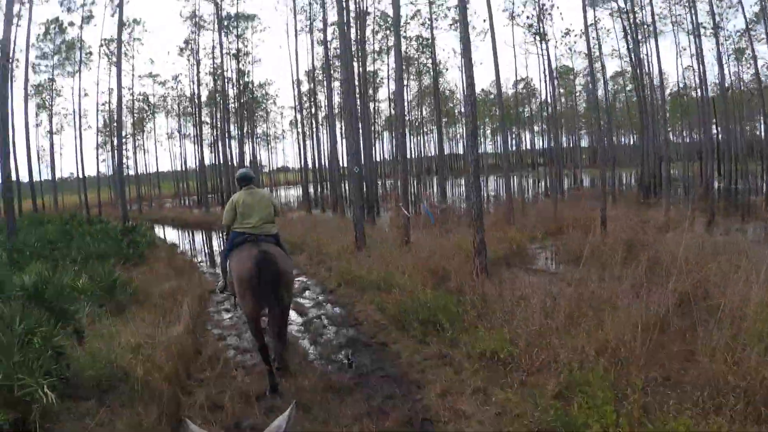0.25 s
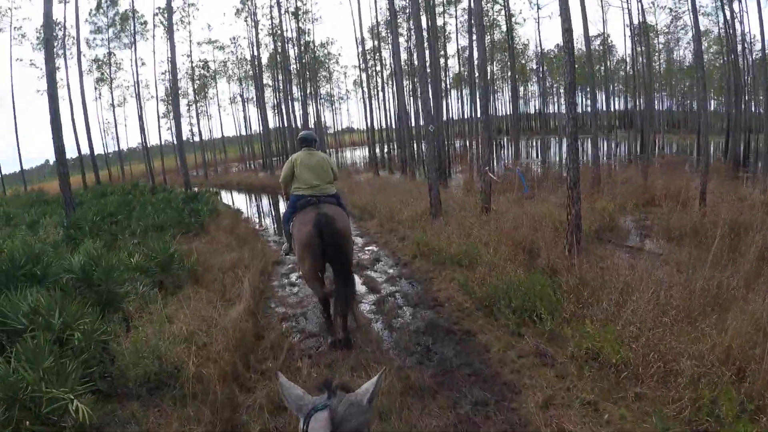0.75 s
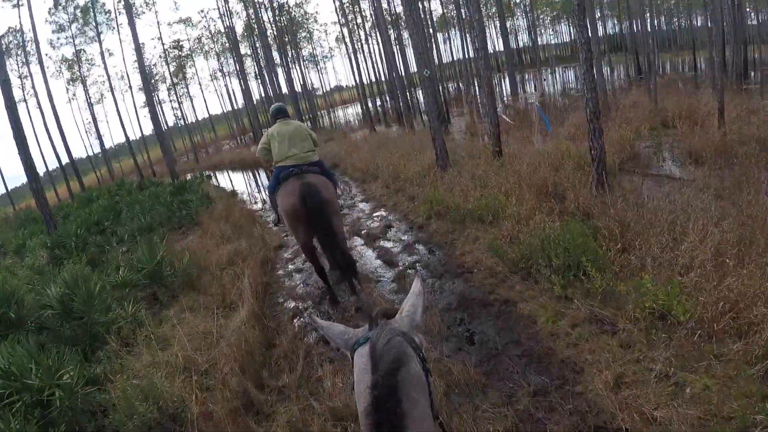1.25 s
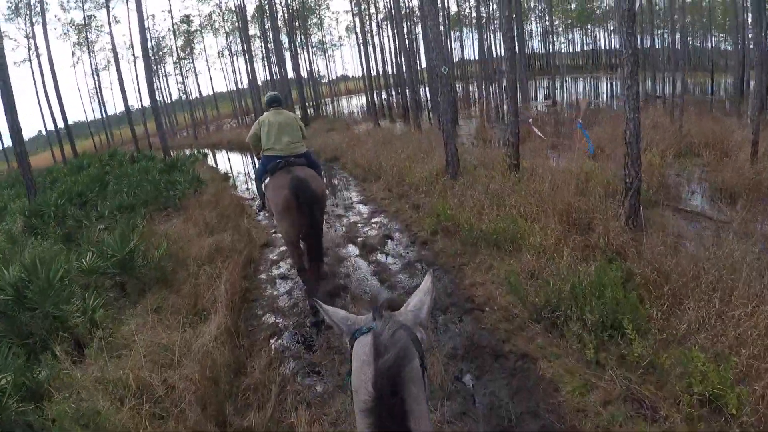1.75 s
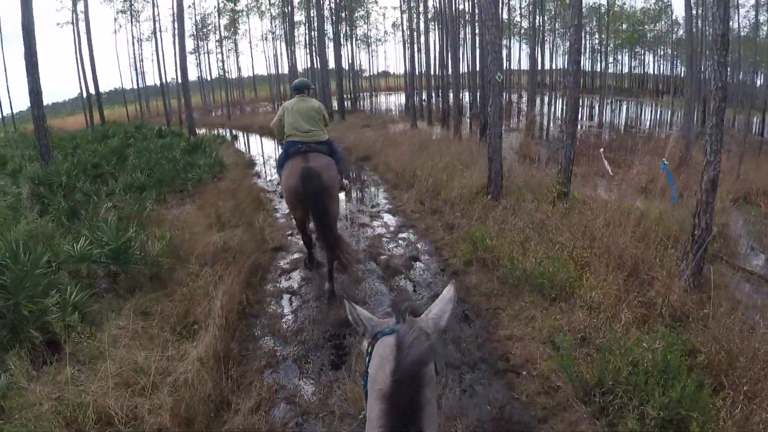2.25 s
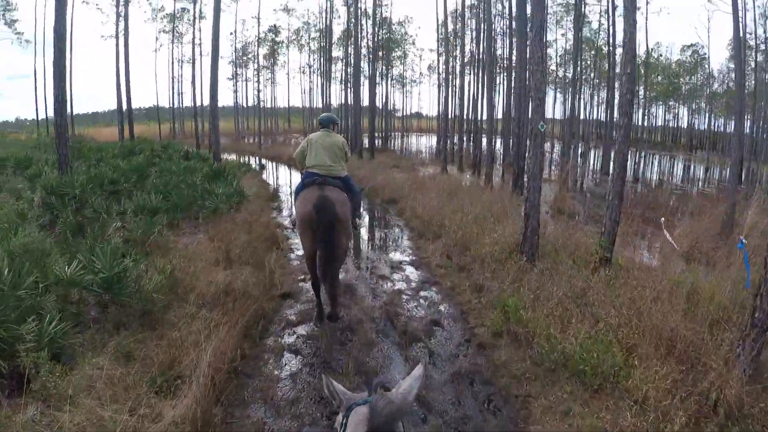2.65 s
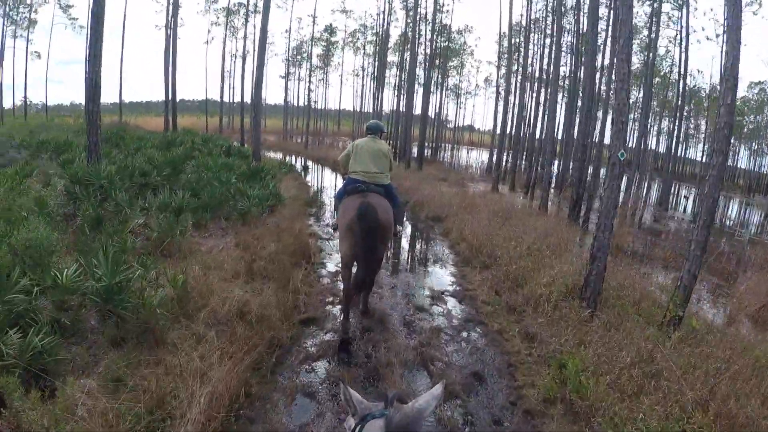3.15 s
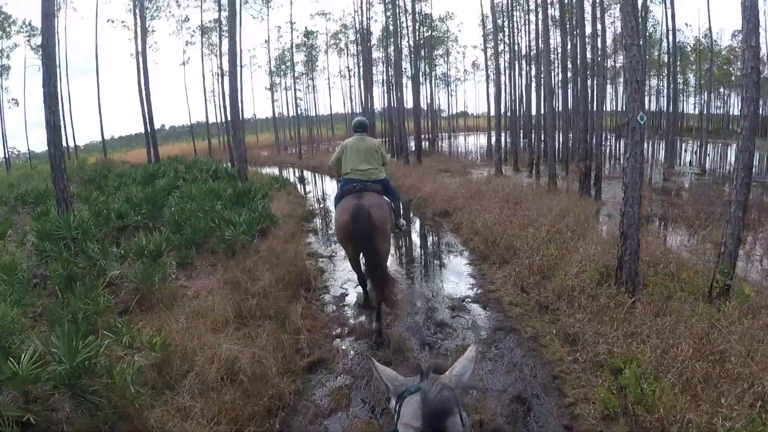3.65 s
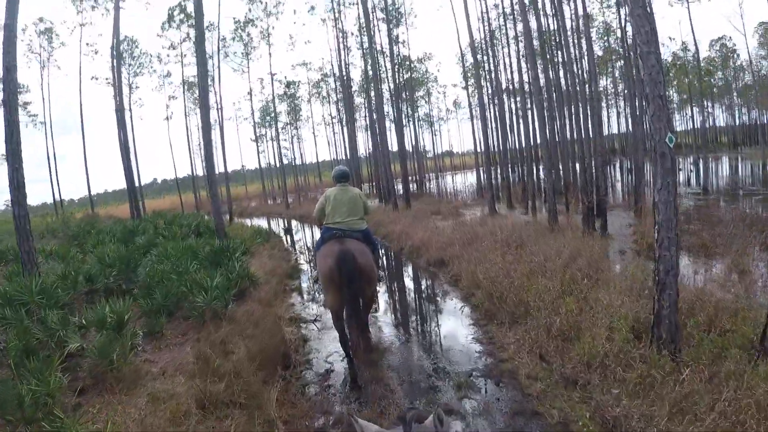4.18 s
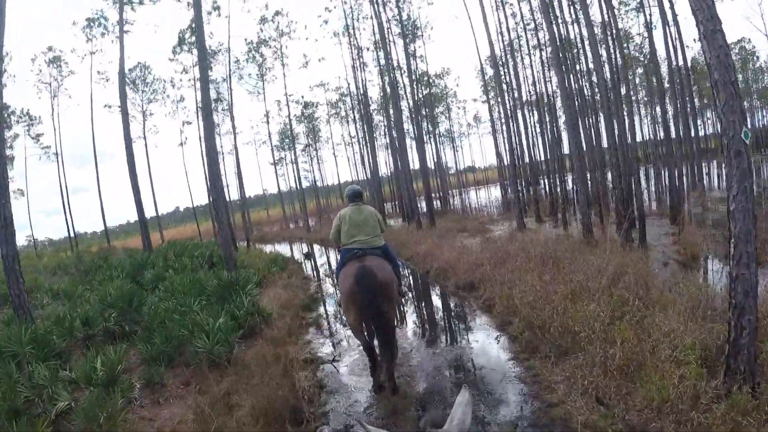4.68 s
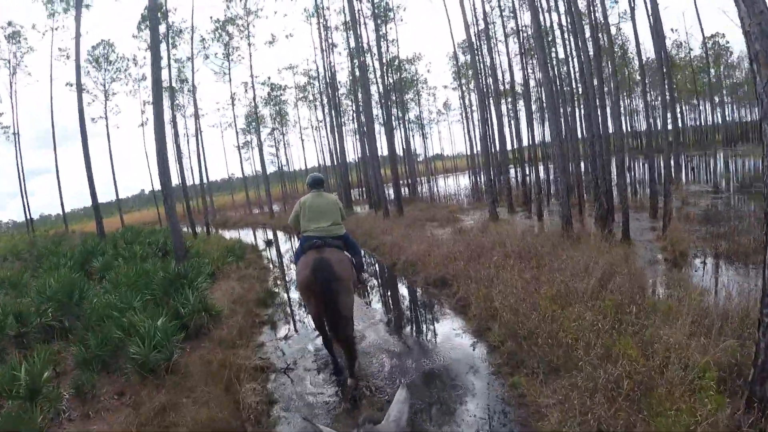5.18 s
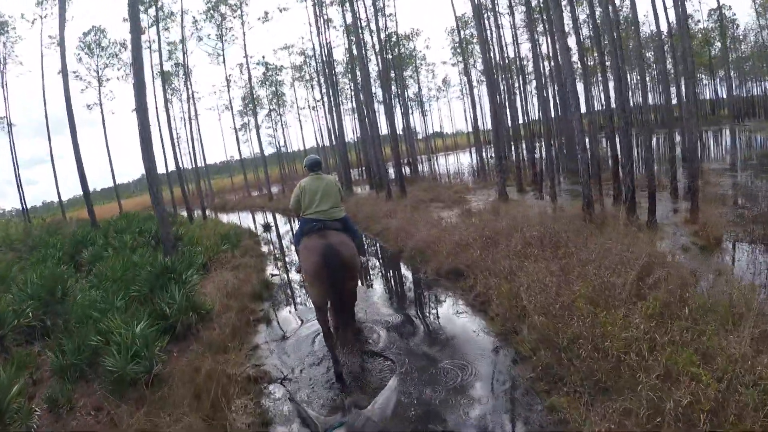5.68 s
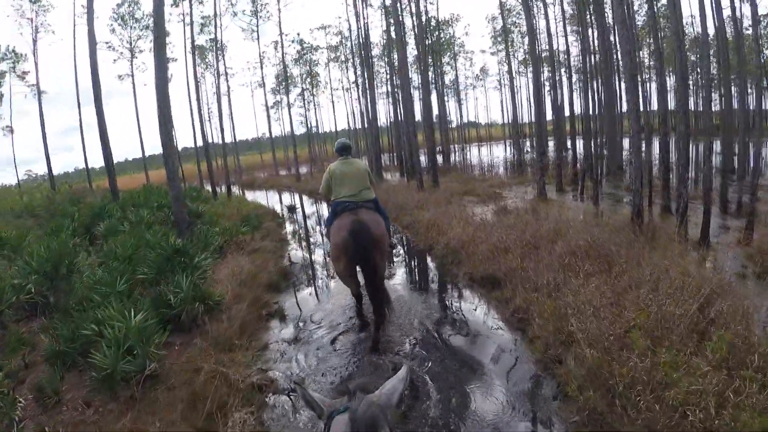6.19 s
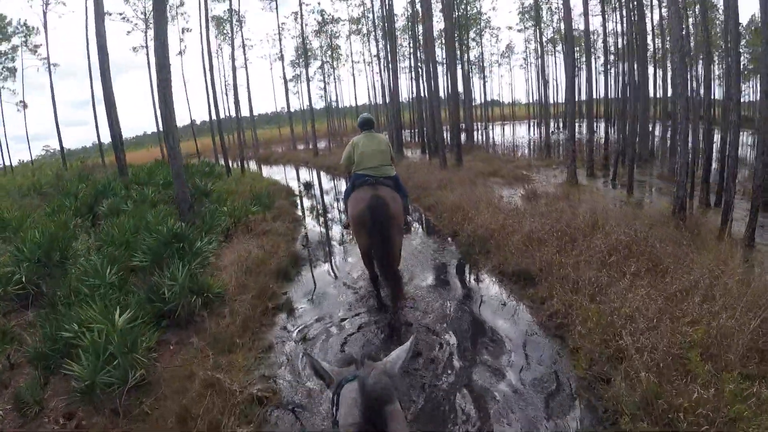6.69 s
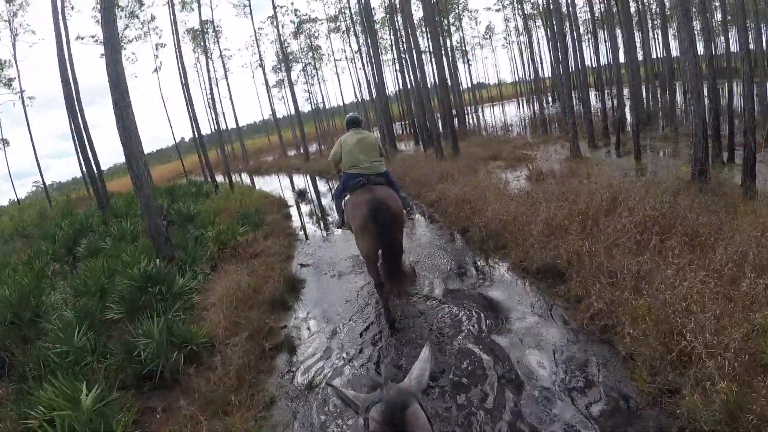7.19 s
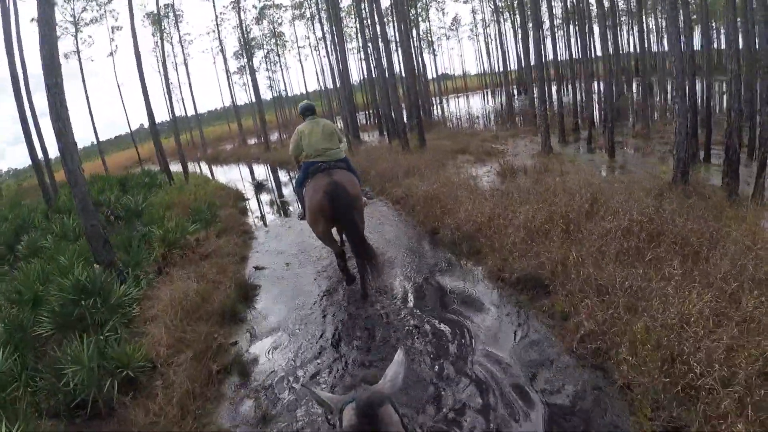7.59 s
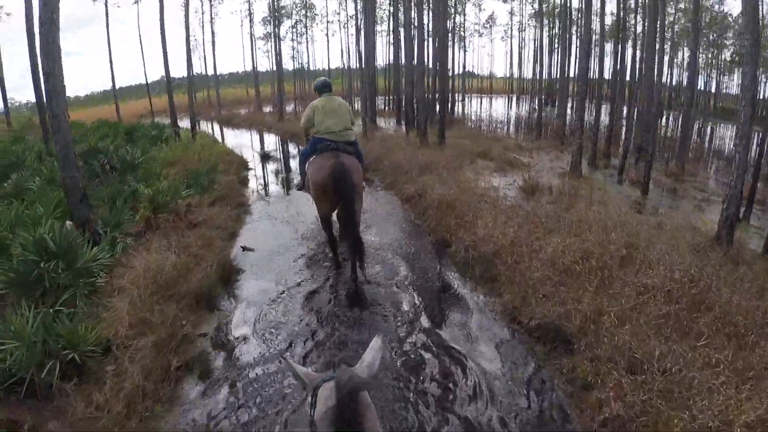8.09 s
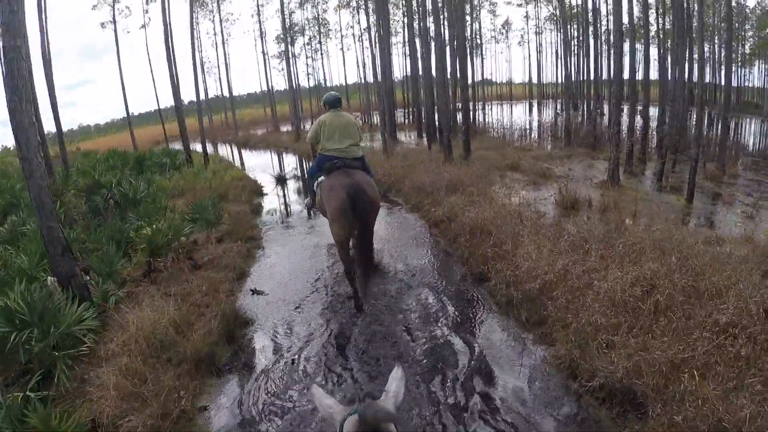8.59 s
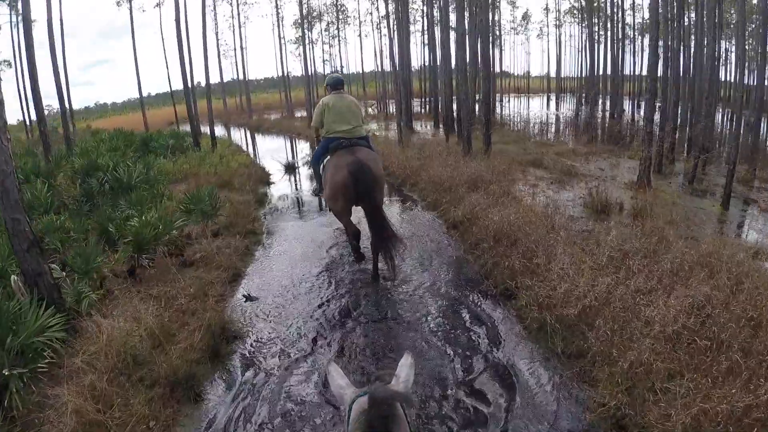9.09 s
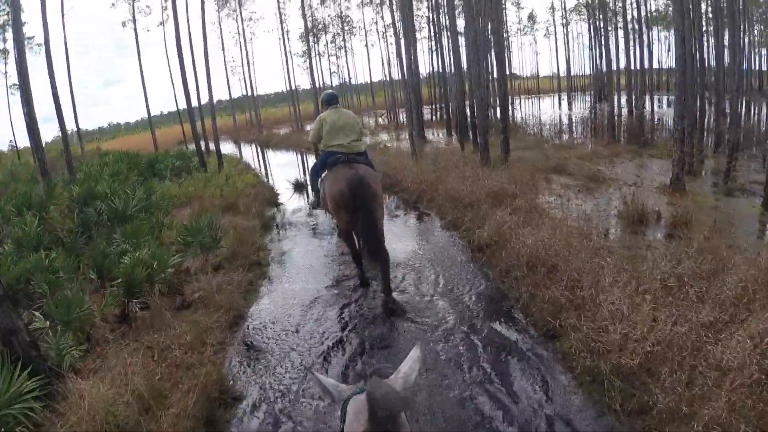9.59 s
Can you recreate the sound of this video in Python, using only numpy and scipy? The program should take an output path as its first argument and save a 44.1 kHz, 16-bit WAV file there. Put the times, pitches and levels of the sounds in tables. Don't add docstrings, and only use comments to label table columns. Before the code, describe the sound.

Horse hooves slap and suck through wet mud, then churn splashing, gurgling flood water, while wind rumbles and flutters against a close outdoor microphone.

```python
import sys
import numpy as np
from scipy import signal
from scipy.fft import rfft, irfft, next_fast_len
from scipy.io import wavfile
from scipy.ndimage import uniform_filter1d

SR = 44100
rng = np.random.default_rng(int(sys.argv[2]) if len(sys.argv) > 2 else 0)


def amplitude_ratio(level_db):
    exponent = np.asarray(level_db, float) / 20
    return 10 ** exponent


def master(y):
    cut = np.clip(np.atleast_2d(y).T, -1, 1)
    pcm = np.round(cut * 32767)
    wavfile.write(sys.argv[1], SR, pcm.astype(np.int16))


N = 433944


def rms_one(x):
    return x / np.sqrt(np.mean(x ** 2) + 1e-20)


def in_time(rows):
    s, *columns = np.transpose(rows)
    return [np.interp(np.arange(N) / SR, s, column) for column in columns]


def bump(s, length_s):
    return np.exp(-((np.arange(N) / SR - s) / length_s) ** 2 / 2)


def around(s, before_s, after_s):
    return slice(max(int((s - before_s) * SR), 0), int((s + after_s) * SR))


def colour(x, spectrum):
    hz, level_db = np.transpose(spectrum)
    size = next_fast_len(N)
    grid_hz = np.maximum(np.arange(size // 2 + 1), 1) * SR / size
    inside_db = np.interp(np.log(grid_hz), np.log(hz), level_db)
    beyond_db = -24 * np.maximum(np.log2(grid_hz / hz[-1]), 0)
    return rms_one(irfft(rfft(x, size) * amplitude_ratio(inside_db + beyond_db), size)[:N])


def hiss(spectrum):
    return colour(rng.standard_normal(N), spectrum)


def drift(rate_hz):
    r = np.exp(-2 * np.pi * rate_hz / SR)
    wander = signal.lfilter([1], [1, -2 * r, r * r], rng.standard_normal(N + SR))
    return rms_one(wander[SR:])


def steady(x, window_s):
    return rms_one(x / np.sqrt(uniform_filter1d(x ** 2, size=int(window_s * SR)) + 1e-3))


def droplets(per_s, spread_db, spectrum, patchy_db):
    spreads = np.minimum(rng.exponential(1, N), 3.3)
    sizes = amplitude_ratio(spread_db * spreads) * rng.choice([-1, 1], N)
    clumps = amplitude_ratio(patchy_db * drift(23.3))
    hits = sizes * (rng.random(N) < per_s / SR)
    return rms_one(clumps * colour(rms_one(hits) + 0.3 * rng.standard_normal(N), spectrum))


def strikes(times, level_db, decay_s, rise_s):
    marks = np.full(N, 1e-18)
    marks[(times * SR).astype(int)] = amplitude_ratio(level_db)
    fall, rise = np.exp(-1 / (decay_s * SR)), np.exp(-1 / (rise_s * SR))
    falling = signal.lfilter([1], [1, -fall], marks)
    return signal.lfilter([1 - rise], [1, -rise], falling)


def add_bubble(out, s, peak_db, hz, octaves, cycles):
    age = np.arange(int(5 * cycles / hz * SR)) / SR * hz / cycles
    phase = 2 * np.pi * np.cumsum(hz * 2 ** (octaves * (age - 1))) / SR
    start = max(int(s * SR), 0)
    out[start:start + len(age)] += amplitude_ratio(peak_db) * age * np.exp(1 - age) * np.sin(phase)


def small_bubbles(level_db, low_hz, span_octaves, cycles, count, climb=.2):
    out = np.zeros(N + SR)
    for when, pitch, size, rise in rng.random((count, 4)):
        at = int(when * (N - 1))
        peak_db = level_db[at] - 3.0 - 13.6 * np.sqrt(size) - 4.0 * pitch
        hz = low_hz * 2 ** (span_octaves * pitch)
        add_bubble(out, at / SR, peak_db, hz, climb * rise ** 2 - .03, cycles * (0.52 + rise))
    return out[:N]


# pitch in Hz, level in dB.
AIR_COLOUR = [(120, -33.5), (200, -0.5), (338, -6.5), (1510, -19), (3600, -23.5), (4640, -33),
              (7550, -22.5), (15000, -36)]


def air():
    return amplitude_ratio(-75) * hiss(AIR_COLOUR)


# time in seconds, rumble in dB, flutter in dB above the rumble.
GUSTS = [(0.0, -55.5, -8), (0.08, -42.5, 5), (1.2, -44, 2), (1.5, -49.5, 6), (2.3, -51.5, -22.5),
         (2.52, -44, -0.5), (2.95, -49, -8), (3.37, -45, 2), (3.55, -60, -10), (3.9, -47, -1.5),
         (4.8, -54.5, 5), (5.12, -38.5, -5), (6.0, -55.5, -10.5), (6.7, -45.5, -7.5), (6.99, -33.5, -10),
         (7.7, -43.5, -10), (8.44, -35.5, -4), (9.84, -40, -5.5)]
# time in seconds, rumble change in dB, flutter change in dB, length in seconds.
LULLS = [(0.225, -2, -7, 0.023), (0.57, -4, -9, 0.19), (2.382, -13, -35, 0.049), (3.076, 0, 8, 0.035),
         (3.176, -2.5, -9.5, 0.053), (3.78, -3.5, -9.5, 0.037), (5.333, -9, -16, 0.053),
         (5.524, 1.5, 4.5, 0.035), (6.17, -8, -20, 0.036), (6.23, 16, 7, 0.01), (6.812, -12.5, -23, 0.11),
         (7.154, -13.5, -23, 0.054), (7.558, -9, -20, 0.019), (8.752, -6.5, -5, 0.087),
         (4.846, -5, -13, 0.059), (9.38, -9, -7, 0.077), (2.77, -1.5, -9, 0.064), (9.565, -4.5, -6, 0.033)]


def gusts():
    rumble_db, above_db = in_time(GUSTS)
    flutter_db = rumble_db + above_db
    for s, rumble_change_db, flutter_change_db, length_s in LULLS:
        dent = bump(s, length_s)
        rumble_db = rumble_db + rumble_change_db * dent
        flutter_db = flutter_db + flutter_change_db * dent
    return rumble_db, flutter_db


# pitch in Hz, level in dB.
RUMBLE_COLOUR = [(8.8, -15), (15, -8.5), (49, 2.5), (110, -7), (140, -73.5), (240, -120)]
FLUTTER_COLOUR = [(60, -15.5), (95, 4.5), (140, 1.5), (200, -8), (280, -22.5), (400, -57)]
WHIP_COLOUR = [(100, 1), (200, -2.5), (320, -5), (450, -26.5), (700, -37)]
# time in seconds, peak in dB, length in seconds.
EDDIES = [
    (0.041, -47.5, 0.0031),
    (0.124, -34, 0.013),
    (0.85, -39, 0.01),
    (0.908, -39, 0.0082),
    (1.192, -35.5, 0.014),
    (1.354, -36, 0.011),
    (1.605, -40, 0.0136),
    (5.591, -45.5, 0.01),
]
# time in seconds, peak in dB, length in seconds.
PORT_KNOCKS = [(0.219, -38, 0.0031), (2.057, -46, 0.0052), (3.62, -40, 0.0022), (4.692, -45, 0.0076),
               (5.106, -41, 0.0038), (6.27, -49, 0.0023), (6.97, -41, 0.0052), (7.139, -41, 0.0036),
               (7.342, -32, 0.0048), (7.838, -45.5, 0.0088), (7.935, -32.5, 0.0023), (8.377, -38, 0.007),
               (8.416, -40, 0.0027), (9.159, -53, 0.0043)]


def wind():
    rumble_db, flutter_db = gusts()
    lumps = drift(10.9)
    out = amplitude_ratio(rumble_db + 0.96 * lumps) * steady(hiss(RUMBLE_COLOUR), 0.12)
    flutter_db = flutter_db - 2.0 + 3.92 * lumps + 3.44 * drift(64.0)
    out += amplitude_ratio(flutter_db) * steady(hiss(FLUTTER_COLOUR), 0.089)
    t, whip = np.arange(N) / SR, hiss(WHIP_COLOUR)
    for s, level_db, length_s in EDDIES + PORT_KNOCKS:
        near = around(s, .1, .15)
        swell = np.exp(-((t[near] - s - 0.9 * length_s) / max(length_s, .003)) ** 2 / 2)
        out[near] += amplitude_ratio(level_db) * swell * whip[near]
    whoop_hz, s_per_octave = 417.6, 0.02005
    for s, level_db, length_s in EDDIES:
        lead_s = np.arange(-4 * length_s, length_s, 1 / SR)
        hz = whoop_hz * 2 ** (lead_s / s_per_octave)
        tone = np.sqrt(hz / whoop_hz) * np.sin(2 * np.pi * np.cumsum(hz) / SR)
        start = int((s - 2.5 * length_s) * SR)
        out[start:start + len(lead_s)] += amplitude_ratio(level_db) * np.hanning(len(lead_s)) * tone
    return out


# time in seconds, depth from 0 to 1, churn in dB, spray in dB, gurgle in dB.
TRAIL = [
    (0.0, 0.4, -106, -100, -77.5),
    (1.1, 0.0, -72, -84, -70),
    (1.3, 1, -71, -84.5, -75),
    (3.6, 0, -77, -84, -71),
    (4.3, 0.7, -66.5, -79.5, -68.5),
    (5.5, 0.83, -75, -76.5, -63.5),
    (6.9, 1.0, -73.5, -68, -64),
    (8.3, 0.05, -66, -66, -58.5),
    (9.84, 0.6, -69.5, -65.5, -61),
]
# time in seconds, churn in dB, spray in dB, gurgle in dB.
STRIDES = [(0.24, -66, -74.5, -78), (0.518, -63.5, -68.5, -75), (0.84, -77, -77, -62),
           (1.091, -55.5, -68, -60), (1.42, -71, -73, -79), (1.7, -63, -73, -71), (2.06, -66, -74, -80),
           (2.35, -57, -68.5, -72), (2.7, -74, -82, -65), (3.009, -62, -67, -59), (3.37, -79, -74, -73),
           (3.64, -59, -65.5, -67), (3.94, -71, -79, -73), (4.2, -81, -74, -82), (4.37, -62.5, -69.5, -72),
           (4.79, -59, -71.5, -68), (5.011, -61, -72, -50), (5.37, -74, -66.5, -82),
           (5.748, -66, -62, -53.5), (5.98, -65, -64.5, -59), (6.07, -66, -62.5, -76),
           (6.459, -56, -59.5, -55.5), (6.7, -68, -61, -78), (6.821, -55, -64.5, -64),
           (7.16, -62, -70, -50), (7.4, -67, -68, -73), (7.85, -65, -70, -66), (8.56, -56.5, -60, -58),
           (9.05, -77, -83, -50.5), (9.381, -60, -82, -46), (9.76, -80, -85, -55.5)]
# time in seconds, dip in dB.
HUSHES = [
    (4.91, -19),
    (5.54, -8),
    (6.24, -5),
    (6.57, -7),
    (7.63, -4.5),
    (7.96, -9),
    (9.47, -9),
]


def surges():
    mud_rise_s, mud_fall_s = 0.015, 0.058
    flood_rise_s, flood_fall_s = 0.055, 0.035
    depth, *beds_db = in_time(TRAIL)
    t = np.arange(N) / SR
    hush_db = sum(dip_db * bump(s, 0.033) for s, dip_db in HUSHES)
    power = amplitude_ratio(2 * (np.array(beds_db) + hush_db * [[1], [1], [.3]]))
    for s, *peaks_db in STRIDES:
        wet = np.clip(depth[int(s * SR)], 0, 1)
        near = around(s, .4, .4)
        rise_s = mud_rise_s + wet * (flood_rise_s - mud_rise_s)
        fall_s = mud_fall_s + wet * (flood_fall_s - mud_fall_s)
        shape = np.exp(-np.maximum((s - t[near]) / rise_s, (t[near] - s) / fall_s))
        power[:, near] += (amplitude_ratio(np.array(peaks_db))[:, None] * shape) ** 2
    return 10 * np.log10(power)


# pitch in Hz, level in dB.
MIST_COLOUR = [(5500, -39), (7000, -7.5), (10800, -1.5), (11600, -13), (14000, -17)]


def mist():
    _, spray_db, _ = surges()
    return amplitude_ratio(-84 + 1.4 * (spray_db + 64)) * droplets(2500.0, 2.5, MIST_COLOUR, patchy_db=4.0)


def slosh():
    _, _, gurgle_db = surges()
    glides = small_bubbles(gurgle_db + 2.0, low_hz=381.2, span_octaves=1.8, cycles=5.0, count=500, climb=.4)
    swirls = np.zeros(N)
    for hollow_hz in (560, 900, 1400):
        swell = drift(45) * amplitude_ratio(4.95 * drift(12.8))
        hz = hollow_hz * 2 ** (.35 * drift(5.0))
        swirls += swell * np.sin(2 * np.pi * np.cumsum(hz) / SR)
    return glides + amplitude_ratio(gurgle_db - 9) * swirls


# pitch in Hz, level in dB.
CHURN_COLOUR = [(700, 0.5), (1300, -5.5), (1850, 4.5), (2500, -0.5), (3700, -5), (4500, -15), (6000, -89)]
SPRAY_COLOUR = [(3000, 1.5), (4200, -1), (5000, 0), (6000, -1), (7000, -9), (11000, -26), (11600, -37),
                (14000, -41)]
GURGLE_COLOUR = [(150, -7), (350, -4), (600, -14.5), (950, -8), (1300, -26), (2000, -22)]


def wading():
    churn_db, spray_db, gurgle_db = surges()
    churn = amplitude_ratio(churn_db - 4.5) * droplets(900.0, 3.4, CHURN_COLOUR, patchy_db=1.0)
    churn += small_bubbles(churn_db + 8, low_hz=900, span_octaves=1.6, cycles=2.8, count=2600)
    gurgle = amplitude_ratio(gurgle_db - 6.5) * droplets(700, 2.6, GURGLE_COLOUR, patchy_db=3.5)
    gurgle += small_bubbles(gurgle_db + 6, low_hz=439.7, span_octaves=1.498, cycles=2.2, count=1500)
    spray = amplitude_ratio(spray_db) * droplets(3000.0, 2.4, SPRAY_COLOUR, patchy_db=1.5)
    return churn + gurgle + spray


# time in seconds, peak in dB, pitch in Hz, length of the ring in cycles.
MUD_BUBBLES = [(1.4126, -54, 1060, 4.3), (1.6966, -59, 2830, 9.1), (1.7138, -55, 1900, 14),
               (1.7357, -56, 1840, 8.1), (1.835, -61, 1120, 4.8), (2.3392, -55, 2900, 9.2),
               (2.4901, -60, 1830, 5.1), (2.603, -41.5, 1575, 3.8), (3.4998, -57, 936.0, 2.6),
               (3.6323, -56, 2240, 10.0), (3.7256, -56, 1280, 3.9), (3.88, -51.5, 630, 1),
               (4.2845, -59, 1180, 1.5), (4.3613, -58, 650, 2.7), (4.3937, -62, 1880, 12),
               (4.4022, -52.5, 990, 7.1), (4.463, -62, 910, 14), (4.5074, -49, 703, 5),
               (4.7214, -57, 1830, 6), (4.8027, -58, 1735, 6.8), (4.906, -49.5, 848, 6),
               (5.024, -53, 1760, 5.8), (5.0992, -55, 746, 4.7), (5.2817, -57, 567, 5.3),
               (5.3915, -57, 2180, 7.9), (5.4106, -57, 1086, 8.4), (5.6839, -59, 1560, 4.2),
               (5.7368, -57, 883, 8.5), (5.7388, -58, 610, 4.8), (5.7669, -60, 905, 6.8),
               (5.9722, -60, 1065, 4.5), (6.0948, -58, 1620, 7.5)]
FLOOD_BUBBLES = [(6.4069, -55.5, 1250, 3.2), (6.4479, -60, 2270, 10.0), (6.4494, -60.0, 2640, 8.6),
                 (6.464, -51, 1420, 10.5), (7.0646, -59, 1442.0, 6.9), (7.1384, -45, 437, 1.8),
                 (7.1504, -56, 1560, 17), (7.191, -55, 1040, 3.6), (7.2541, -57, 793, 4.1),
                 (7.3, -56, 1490, 7.9), (7.3393, -46, 495, 1.6), (7.3832, -56, 1280, 4.8),
                 (7.414, -56, 1590, 5), (7.567, -42.5, 466, 2.3), (7.57, -49, 820, 1.5),
                 (7.8822, -54.5, 960, 4.9), (8.0506, -52, 530, 4.7), (8.219, -59, 1518.0, 9),
                 (8.242, -54.5, 1610, 6.2), (8.34, -55, 1055, 3.8), (8.379, -56, 1230, 6.4),
                 (8.4486, -50.5, 834, 2.5), (8.5193, -57, 1490, 5.7), (8.5542, -60, 2310, 10.0),
                 (8.589, -49.5, 886, 10), (8.6904, -50, 565, 2.8), (8.7244, -41.5, 934, 4),
                 (8.7259, -36.5, 555, 1.6), (9.0446, -50, 553, 2.5), (9.085, -35, 1760, 2.9),
                 (9.0863, -45, 1120, 2.1), (9.0906, -53, 2700, 6.9), (9.274, -53, 1600, 6.2),
                 (9.353, -57, 1744.0, 9.4), (9.392, -45.5, 808, 5.4), (9.3884, -56.0, 1860, 5.2),
                 (9.6209, -53, 1500, 4.2), (9.6762, -54, 1260, 4.2), (9.7094, -32.5, 2000, 4.6),
                 (9.7112, -36.5, 1480, 4.4)]


def trapped_bubbles():
    out = np.zeros(N + SR)
    for s, peak_db, hz, cycles in MUD_BUBBLES + FLOOD_BUBBLES:
        add_bubble(out, s, peak_db - 0.5, hz, octaves=0.021, cycles=max(cycles, 1))
    return out[:N] * amplitude_ratio(-2.0) * (1.1 + .65 * drift(260.0))


# time in seconds, peak in dB, pitch in Hz.
GULPS = [(3.622, -41.5, 452), (4.126, -46, 910), (4.286, -46, 1086), (4.338, -50, 605),
         (4.401, -42.5, 1190), (4.8, -41.5, 458), (4.897, -44, 960), (5.009, -40.5, 596), (5.077, -39, 736),
         (5.218, -46, 987), (5.769, -46, 874), (6.073, -46, 461), (6.464, -39, 870), (6.675, -47, 464),
         (6.814, -42.5, 753), (6.839, -43.5, 854), (7.063, -49, 460), (7.095, -42.5, 980),
         (7.19, -45.5, 360), (8.378, -42.5, 736), (9.045, -49, 506), (9.359, -40.5, 824),
         (9.75, -37.5, 615)]


def bubble_swarms():
    out = np.zeros(N + SR)
    parents = [row[:3] for row in MUD_BUBBLES + FLOOD_BUBBLES]
    parents += [(s, peak_db - 6.5, hz) for s, peak_db, hz in GULPS]
    broods = rng.random((len(parents), 4, 3))
    for (s, peak_db, hz), brood in zip(parents, broods):
        for late, pitch, size in brood:
            when = s + .045 * late ** 2 - .004
            level_db = min(peak_db, -51) - 3.0 - 16.5 * late - 10.0 * size
            add_bubble(out, when, level_db, hz * 2 ** (.7 * (pitch - .45)), .06, 2.15 + 3.0 * size)
    return out[:N]


# time in seconds, peak in dB, pitch in Hz.
GLOOPS = [
    (4.289, -54.5, 497),
    (5.274, -45.5, 540),
    (5.959, -44, 382),
    (6.135, -48, 530),
    (8.891, -50, 433),
    (8.944, -40, 428),
]
# time in seconds, peak in dB, pitch in Hz.
SUCKS = [
    (2.374, -45.5, 997),
    (2.494, -50.5, 1077),
    (3.499, -54, 1100),
]
# time in seconds, peak in dB, pitch in Hz.
GROUND_KNOCKS = [
    (0.227, -39, 415),
    (0.828, -34, 437),
    (0.828, -36, 785),
    (2.605, -50, 693),
]


def gulps():
    out = np.zeros(N + SR)
    kinds = ((GULPS, .05, 2.3), (GLOOPS, .28, 3.4), (SUCKS, -.2, 5.0), (GROUND_KNOCKS, 0, .9))
    for table, octaves, cycles in kinds:
        for s, peak_db, hz in table:
            add_bubble(out, s - .003, peak_db - .7, hz, octaves, cycles)
    wobble = 1 + .5 * drift(170.0)
    s, peak_db, _ = np.transpose(GULPS + GLOOPS + SUCKS)
    froth = strikes(s, peak_db - 12.5, 0.018, 0.001) * hiss(GURGLE_COLOUR)
    return out[:N] * wobble * amplitude_ratio(-6.0) + froth


# time in seconds, peak in dB, body in dB above the peak.
DROPS = [(0.484, -56, 2.5), (0.9516, -64.5, 9), (1.295, -69, 14), (1.4331, -59.5, 4), (2.601, -46, 0),
         (2.7494, -71, 8), (2.83, -70.5, 11), (2.9687, -65, -6), (3.676, -58.5, 11.5), (3.7294, -66.5, 13),
         (4.584, -57, -1), (5.0266, -47, -4), (5.6605, -55, 1), (5.7044, -47, -14), (5.731, -39.5, -3),
         (5.9325, -60, 2), (6.047, -61.5, 10), (6.199, -65.5, 7), (6.2272, -56, -11), (6.335, -52, -4),
         (6.368, -56, 5.5), (6.3939, -46, -13), (6.599, -68, 9), (6.6256, -53, -6), (6.6942, -55, -8),
         (6.8319, -45, -12), (7.0374, -51, -15), (7.1146, -49, -2), (7.357, -53, 0), (7.417, -47, -4),
         (7.4954, -46.5, -3.5), (7.607, -50, -19), (7.7014, -50, 0), (7.7907, -47, -10), (7.8281, -48, -1),
         (8.1309, -64, -1), (8.3629, -44.5, -5), (8.4213, -54, -1), (8.4841, -53, -15), (8.5035, -43, -23),
         (8.995, -54.5, 8.5), (9.1424, -69, 2), (9.326, -40.5, -7), (9.4025, -57, 2), (9.522, -44.5, -6),
         (9.708, -48, -1)]
# pitch in Hz, level in dB.
SMACK_COLOUR = [(700, 0), (1150, -1), (1600, -1), (1950, 2), (2500, -0.5), (3600, -5), (4400, -15.5),
                (6000, -57)]


def drops():
    s, peak_db, body_db = np.transpose(DROPS)
    tick_colour = [(3000, -8.0), (5000, 12.0), (7000, -2.5), (11000, -14.5), (13000, -26)]   # Hz, dB
    tick = strikes(s, peak_db - 10.5, 0.0039, 0.0007) * hiss(tick_colour)
    body = strikes(s, peak_db + body_db - 7.5, 0.013, 0.0007) * hiss(SMACK_COLOUR)
    return tick + body


# time in seconds, peak in dB, thud in dB above it,
# crack in dB above it, pitch of the hollow in Hz.
HOOF_SLAPS = [(0.223, -60, 11.5, -10, 1840), (0.823, -58.5, 13.5, -8, 1590), (1.071, -51, -8, -15, 1650),
              (1.671, -53.5, 3, -12, 1970), (1.695, -45.5, 0, -11.5, 2200), (1.729, -53, 10, -13, 1920),
              (1.832, -51, -15, -8.5, 2380), (2.0565, -54, -3, -16, 1730), (2.193, -54, -33, -14, 1930),
              (2.337, -46.5, 5.5, -13, 1840), (2.49, -49.5, -24, -20, 1290), (2.601, -54, 6.5, 4, 1700),
              (3.147, -55.5, -11, -8.5, 3460), (3.3584, -55, -2, -17, 1600), (3.495, -54.5, -2, -11.5, 1340),
              (3.622, -57.5, -15, -4, 2360), (3.8237, -56, 5, -6, 1310), (4.169, -52, -21, -32.5, 2750),
              (4.187, -53, -21, -12, 2400), (4.336, -57.5, 8, -11, 2280), (4.368, -51, -2, -5, 2380),
              (4.482, -57, 6, -11, 1400), (4.693, -52.5, 0, -9, 1770), (4.803, -52.5, 1, -39, 1840),
              (5.071, -60, 19, -35, 1410), (5.1915, -52, -5, -8, 2000), (5.385, -52, -2, -11.5, 1660),
               (5.6513, -56, -18, -12, 1560), (5.74, -47.5, -3, -4, 1590), (6.446, -51, -21, -3, 1460),
               (6.765, -50.5, 4, -8, 1480), (6.8124, -53.5, -18, -11, 2240), (7.088, -49, -2, -11, 1430),
               (7.138, -50, -13, -1.5, 1660), (7.381, -52.5, -20, -13, 1510), (7.845, -47, -11, -6, 1610),
               (8.0551, -51, -20, -26, 1940), (8.52, -54, 4, -3, 1440), (8.691, -50.5, -9, -1, 1780),
               (8.7293, -53, 8, -25, 1670), (9.087, -47.5, 4, 3.5, 1820), (9.3143, -56, -18, -5, 2550),
               (9.358, -48.5, 2, -18, 1430), (9.39, -66, 24.5, -24, 1880), (9.503, -58, -17, -16, 1570),
               (9.7085, -46.5, -2, -0.5, 1930)]
# time in seconds, peak in dB, thud in dB above it.
SPATTERS = [(0.309, -57.5, -23), (0.525, -54, -21), (1.114, -61, 3), (1.411, -58.5, -6), (1.5653, -59, -6),
            (1.62, -69.5, 21), (1.9119, -54, -2.5), (1.745, -58, 10), (2.683, -60.5, -15),
            (2.7037, -57.5, -13), (3.009, -53, -13), (3.0275, -55, -15), (3.704, -53, -4),
            (3.8777, -69, 15), (4.721, -59, 0), (4.898, -67.5, 24.5), (5.01, -52.5, 8), (1.846, -60, -6),
            (7.3025, -67, -4), (8.0194, -56, -20), (8.877, -57, -13),]
# pitch in Hz, level in dB.
THUD_COLOUR = [(200, -43), (400, 2), (700, 7), (1000, 8.5), (1300, -2.5), (2000, -38.5)]
CRACK_COLOUR = [(3200, -13.5), (4300, -4), (5100, -2), (6500, -8.5), (9000, -21.5), (11500, -42)]


def slaps():
    spatter_crack_db, spatter_hz, spatter_spread_hz = -13, 1920, 190
    small = []
    for row in SPATTERS:
        small.append((*row, spatter_crack_db, spatter_hz + spatter_spread_hz * rng.uniform(-0.92, 1)))
    s, peak_db, thud_db, crack_db, cavity_hz = np.transpose(HOOF_SLAPS + small)
    smack = strikes(s, peak_db - 1.5, 0.0086, 0.0019) * hiss(SMACK_COLOUR)
    thud = strikes(s, peak_db + thud_db + 0.5, 0.004, 0.0024) * hiss(THUD_COLOUR)
    crack = strikes(s, peak_db + crack_db - 0.5, 0.0066, 0.0013) * hiss(CRACK_COLOUR)
    ragged = amplitude_ratio(2.8 * drift(122.0))
    patter = strikes(s, peak_db - 10.5, 0.026, 0.0027) * droplets(450.0, 4.5, SMACK_COLOUR, patchy_db=5.5)
    ring = np.zeros(N + SR)
    for when, level_db, hz in zip(s, peak_db, cavity_hz):
        add_bubble(ring, when - .0005, level_db - 4.0, hz, octaves=-0.019, cycles=3.7)
    return ragged * (smack + crack) + thud + patter + ring[:N]


def scene():
    background = air() + wind()
    water = mist() + slosh() + wading()
    bubbles = trapped_bubbles() + bubble_swarms() + gulps()
    return (background + water + bubbles + drops() + slaps())[None]


def roll_off(x):
    return signal.sosfilt(signal.butter(12, 15560, fs=SR, output="sos"), x)


def record(dry):
    top_cut = signal.cheby2(10, 50, 16200, fs=SR, output="sos")
    return roll_off(signal.sosfilt(top_cut, dry))


dry = scene()
out = record(dry)
master(out)
```